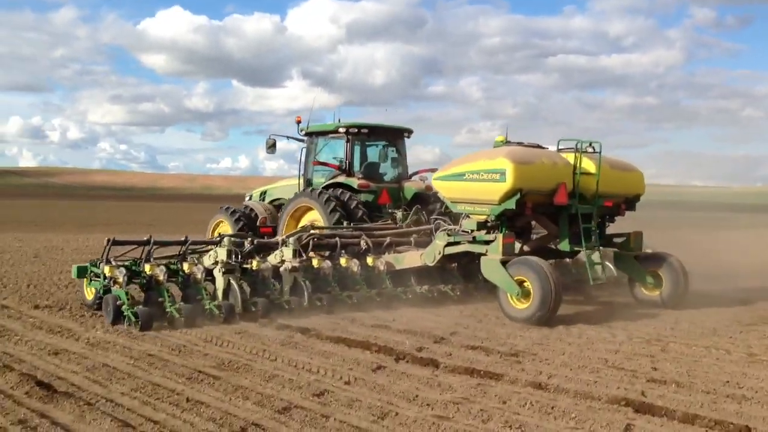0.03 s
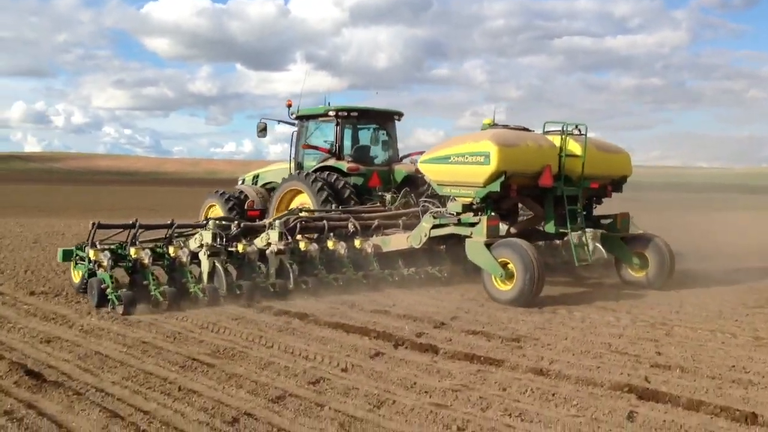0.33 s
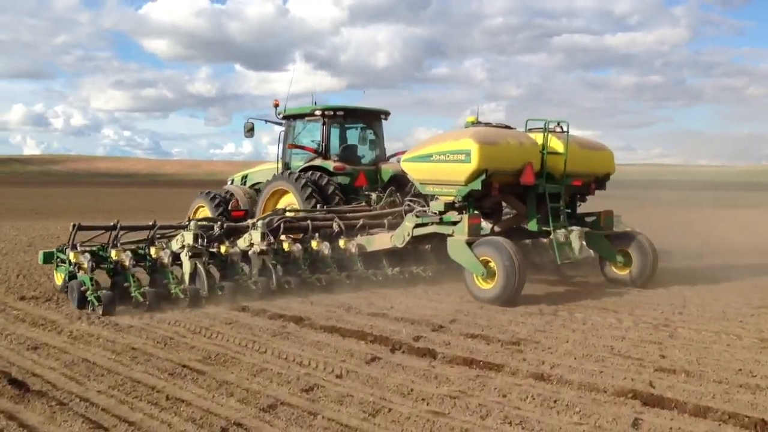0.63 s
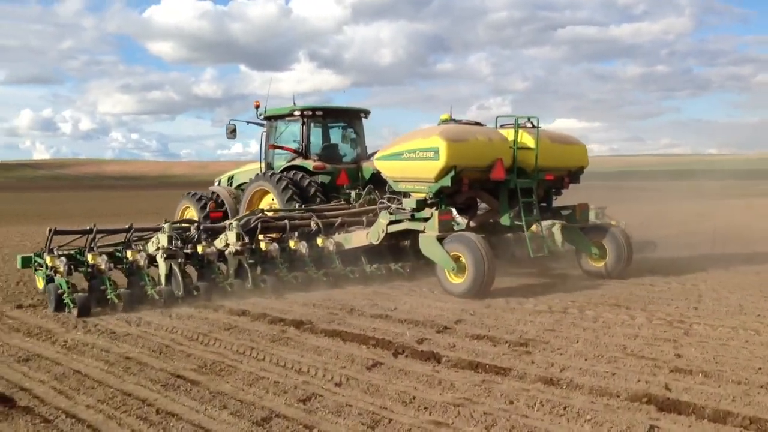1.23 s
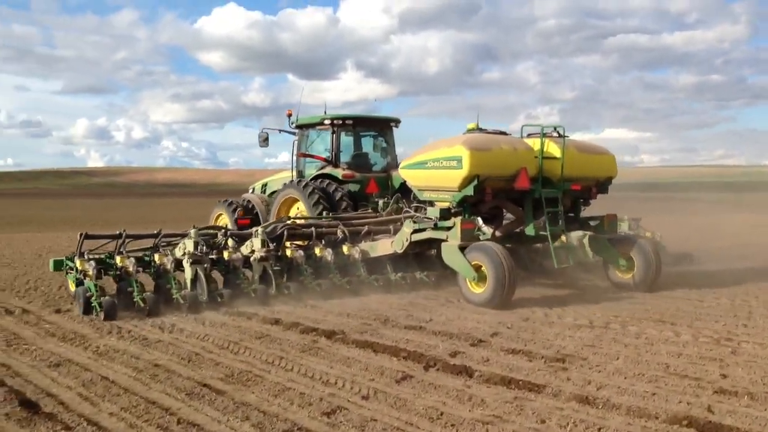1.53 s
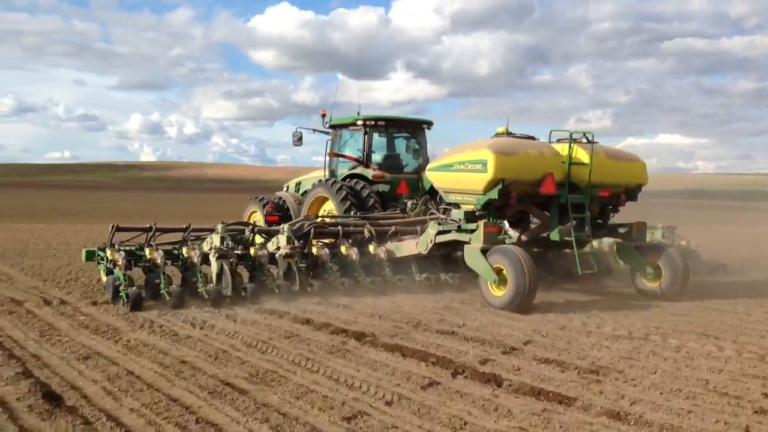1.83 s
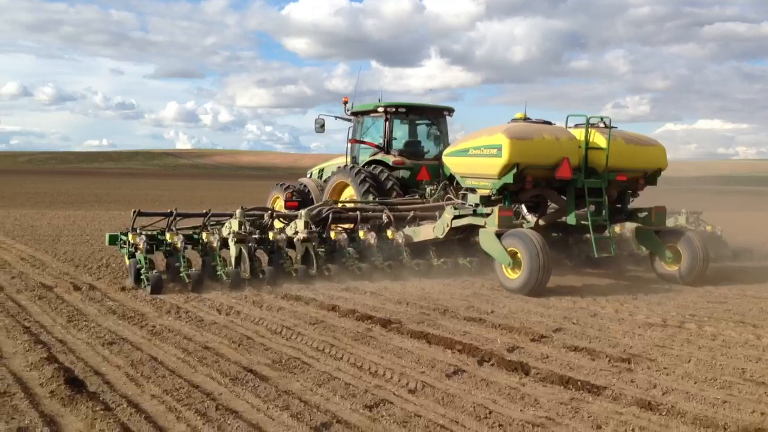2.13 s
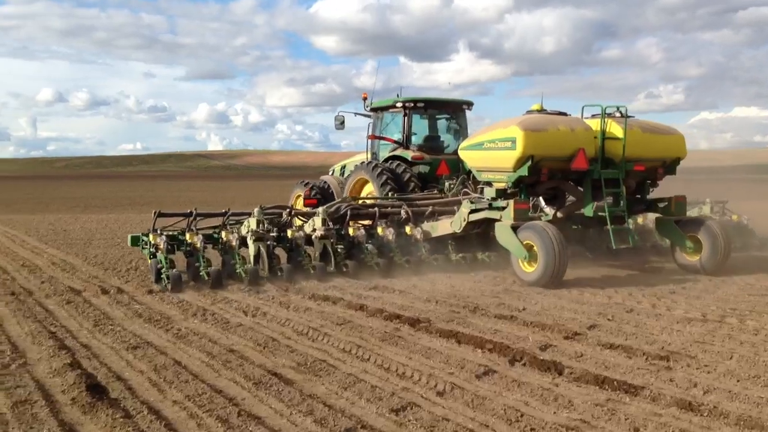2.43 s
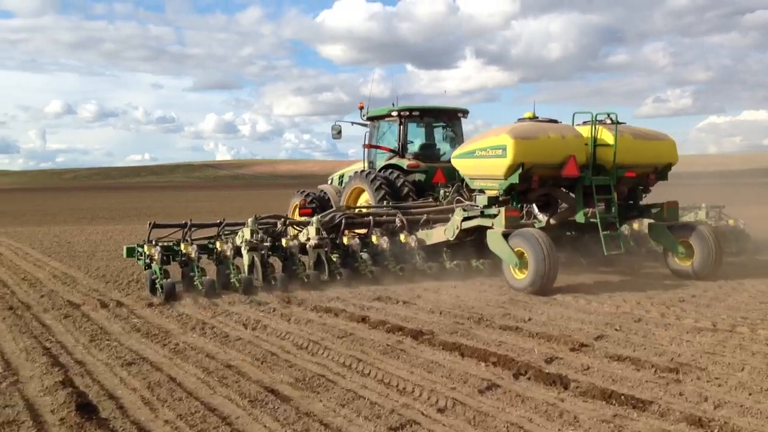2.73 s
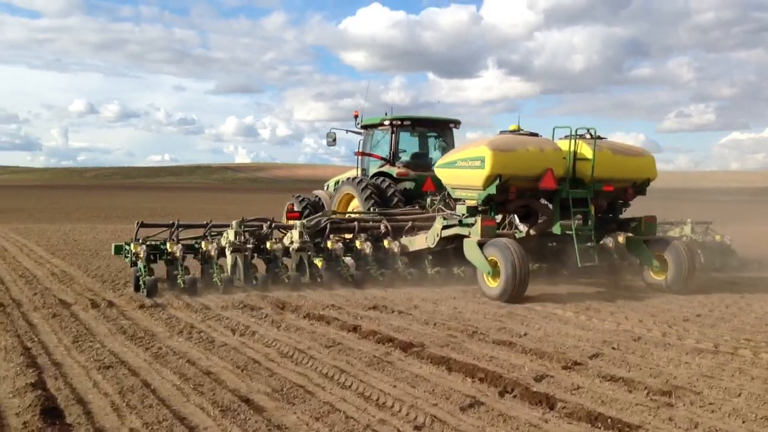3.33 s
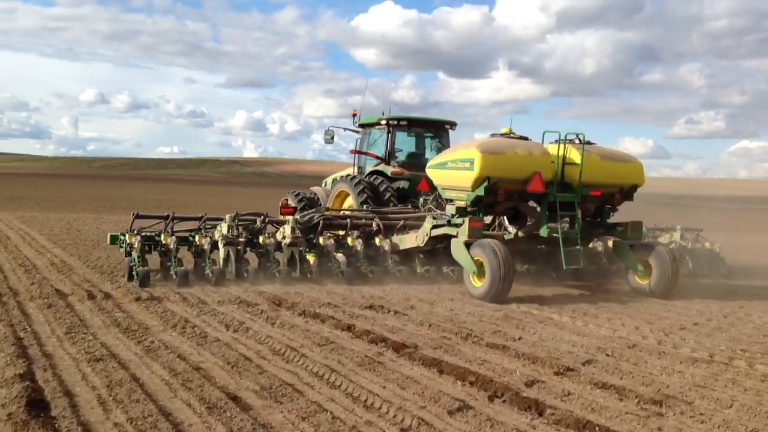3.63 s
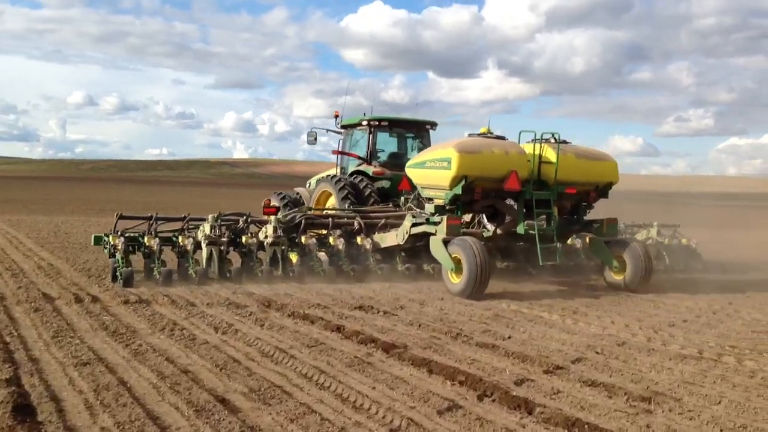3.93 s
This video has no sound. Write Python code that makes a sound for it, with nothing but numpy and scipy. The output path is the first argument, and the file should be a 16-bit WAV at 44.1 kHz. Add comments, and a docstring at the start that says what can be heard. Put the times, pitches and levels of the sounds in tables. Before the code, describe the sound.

A tractor pulls a planter across an open field some way off, its diesel roaring steadily. The planter's blower whines and hisses, with faint brief squeals, while light wind bumps the microphone, most near the end.

```python
"""A tractor pulls an air planter across a dry field, some way from the microphone.
The planter's blower sings in four partials that swell and fade; hydraulic drives, gears and the turbo
whine with the engine speed. Under them roar the diesel and the blower's air, and bearings squeal
faintly. Close up, a breeze rumbles and bumps on the microphone."""
import sys
import numpy as np
from scipy import signal
from scipy.fft import rfft, irfft, next_fast_len
from scipy.io import wavfile
from scipy.ndimage import uniform_filter1d, map_coordinates

SR = 44100
rng = np.random.default_rng(int(sys.argv[2]) if len(sys.argv) > 2 else 0)


def wrap_up_sound(samples):
    """Save the sound to the file named by the first command line argument, as 16-bit audio."""
    columns = np.atleast_2d(samples).T
    # keep every value between -1 and 1, then stretch to whole-number steps
    tamed = np.clip(columns, -1, 1)
    steps = np.round(tamed * 32767).astype(np.int16)
    wavfile.write(sys.argv[1], SR, steps)


N = 176400


def amp(db):
    """Decibels to gain."""
    return 10 ** (np.asarray(db) / 20)


def unit(x):
    """Scaled to rms 1."""
    return x / np.sqrt(np.mean(x ** 2) + 1e-20)


def along(points, hz):
    """Read (Hz, value) points at hz, on a log frequency axis."""
    freqs, values = np.transpose(points)
    return np.interp(np.log(hz + 1), np.log(freqs + 1), values)


def curves(rows):
    """One value per sample for each column after the time."""
    times, *columns = np.transpose(rows)
    return [np.interp(np.arange(N) / SR, times, column) for column in columns]


def wobble(rate):
    """A smooth random curve, rate knots a second."""
    return map_coordinates(rng.standard_normal(2048), [np.arange(N) * rate / SR], mode="wrap")


def filtered(x, response):
    """Filter x by a gain given as a function of Hz."""
    size = next_fast_len(N + SR // 2)
    return irfft(rfft(x, size) * response(np.fft.rfftfreq(size, 1 / SR)), size)[..., :N]


def rush(spectrum, patchy_db):
    """Coloured noise of rms 1, with patches of random gain in time and frequency."""
    bins = signal.stft(rng.standard_normal(N), nperseg=512)[2]
    patches = uniform_filter1d(rng.standard_normal(bins.shape), size=6, axis=0)
    patches = uniform_filter1d(patches, size=16, axis=1)
    noise = signal.istft(bins * amp(patchy_db * unit(patches)), nperseg=512)[1][:N]
    return unit(filtered(noise, lambda hz: amp(along(spectrum, hz))))


def tone(hz, speed, drift, scatter, flutter_rate):
    """A whine of rms 1 that follows the shaft speed; moving air scatters part of it."""
    phase = 2 * np.pi * np.cumsum(hz * speed * (1 + drift * wobble(6))) / SR
    in_phase = (1 + scatter * wobble(flutter_rate)) * np.sin(phase)
    quadrature = scatter * wobble(flutter_rate) * np.cos(phase)
    return unit(in_phase + quadrature)


def blower(speed, blade_hz):
    """The blower's blade-pass tone and overtones, each swelling and fading as the rig moves."""
    # Swells of partials 1 to 4. Each row: time in seconds, level in dB before the trim.
    first = [(0, -32.5), (0.4, -28), (0.65, -31.5), (1.15, -34.5), (1.45, -27.5), (1.8, -30.5),
             (2.1, -30.5), (2.55, -31.5), (2.85, -35.8), (3.1, -36), (3.35, -41), (4, -50)]
    second = [(0, -35.1), (0.17, -35), (0.28, -43.1), (0.5, -30.4), (0.62, -28.5), (0.85, -42),
              (1.05, -30.7), (1.28, -32), (1.45, -40.2), (1.62, -42), (1.98, -31.5), (2.15, -40.5),
              (2.4, -33.5), (2.65, -26), (3.1, -27.5), (3.5, -32), (4, -31.5)]
    third = [(0, -58), (1.1, -51), (1.55, -39.5), (2, -42), (2.4, -36.5), (3.1, -35), (3.5, -47.2),
             (4, -40)]
    fourth = [(0, -42), (0.35, -47.6), (0.65, -37.5), (1.3, -48.5), (1.6, -41), (2.4, -42), (2.6, -46.5),
              (3.05, -45.5), (3.35, -45), (3.8, -39), (4, -43.5)]
    # One trim in dB for each partial.
    trim_db = [0.2, -0.13, -0.09, -0.3]
    out = np.zeros(N)
    for k, swells in enumerate([first, second, third, fourth]):
        gain = amp(curves(swells)[0] + trim_db[k])
        out += gain * tone((k + 1) * blade_hz, speed, drift=.0002, scatter=.14, flutter_rate=16)
    return out


def drives(speed):
    """Pump, gears and turbo whine with the engine; the high whistles are the most blurred."""
    # Swells of the pump and gear whines. Each row: time in seconds, level in dB (the gear gets 3 more).
    pump_levels = [(0, -47), (.9, -39), (1.9, -41), (2.5, -37.5), (3.3, -37.5), (4, -33.5)]
    gear_levels = [(0, -40), (0.15, -41), (0.35, -34), (0.65, -34.5), (0.95, -36), (1.3, -40), (1.6, -46),
                   (1.8, -38.5), (2.05, -53.5), (2.3, -43), (2.6, -48), (2.85, -37), (3.1, -48.5),
                   (3.4, -39.5), (3.55, -49), (3.75, -43), (4, -45)]
    # Weaker whines and whistles of drives and turbo. Each row: pitch in Hz, level in dB.
    whine_notes = [(501, -48), (601, -53), (971, -42), (1101.5, -45.5), (1941, -45), (2204, -46),
                   (3304, -51), (3777, -51.5), (3808, -71), (4007, -50)]
    whistle_notes = [(4588, -48.5), (6112, -60), (8035, -58), (9118, -61.5), (10410, -59), (12500, -67),
                     (14290, -62)]
    pump = tone(893, speed, drift=.00059, scatter=.073, flutter_rate=13)
    gear = tone(3905, speed, drift=.0002, scatter=.19, flutter_rate=22)
    whines = sum(amp(db) * tone(hz, speed, drift=.001, scatter=.46, flutter_rate=12)
                 for hz, db in whine_notes)
    whistles = sum(amp(db) * tone(hz, speed, drift=.0013, scatter=.84, flutter_rate=40)
                   for hz, db in whistle_notes)
    pump *= amp(curves(pump_levels)[0])
    gear *= amp(curves(gear_levels)[0] + 3)
    return pump + gear + whines + whistles


def roar(speed):
    """Diesel roar and hissing air lines across the field; upper roar and hiss pulse with each firing."""
    # Spectra of the roar and of the hiss. Each row: frequency in Hz, relative density in dB.
    roar_spectrum = [(20, -48), (50, -30), (90, -19), (135, -7), (185, 2), (260, -12), (370, -13),
                     (450, -4.5), (520, 3), (630, 0), (740, 3), (860, 0), (1020, -3.5), (1250, -0.5),
                     (1450, 2), (1680, -2.5), (1980, -0.5), (2300, -4.5), (2650, -11), (2950, -14),
                     (3600, -32), (8000, -65)]
    hiss_spectrum = [(1500, -50), (2930, -25), (3010, -2.5), (3500, 1), (4450, -.5), (5200, -4.5),
                     (6200, -9), (7200, -10.5), (8300, -11), (10500, -14), (13500, -18), (15300, -23.5)]
    # Swells, each taken about its mean. Each row: time in seconds, then low roar, high roar, hiss in dB.
    swells = [(0.0, -33, -36.5, -40.5), (0.08, -34, -36, -39.5), (0.37, -35, -36, -40),
              (0.47, -33.5, -36.5, -39), (0.92, -33.5, -36, -39.5), (1.38, -34, -36.5, -40),
              (1.43, -31, -36, -39), (1.49, -35.5, -34.5, -38.5), (1.67, -34.5, -36.5, -40),
              (2.33, -36, -36, -40), (2.56, -30, -35.5, -40.5), (2.88, -35.5, -35, -40.5),
              (3.81, -35, -36, -40.5), (4.0, -33.5, -36.5, -41)]
    roar_db, hiss_db, split_hz = -29, -33.5, 960
    firing_hz, firing_depth = 99.1, .091
    low_swell, high_swell, hiss_swell = [amp(db - db.mean()) for db in curves(swells)]
    firing = firing_depth * np.cos(2 * np.pi * np.cumsum(firing_hz * speed) / SR)
    body = rush(roar_spectrum, patchy_db=1.36)
    low = filtered(body, lambda hz: 1 / (1 + (hz / split_hz) ** 6))
    engine = low * low_swell + (body - low) * high_swell * (1 + firing)
    air = rush(hiss_spectrum, patchy_db=.98) * hiss_swell * (1 + .5 * firing)
    return amp(roar_db) * engine + amp(hiss_db) * air


def breeze():
    """A faint, restless rumble of air moving over the microphone."""
    # Colour of the rumble. Each row: frequency in Hz, relative density in dB.
    spectrum = [(20, -29), (60, -22), (100, -13), (160, 1), (250, -5.5), (340, -8), (550, -17), (1500, -52)]
    # Rise and fall of the breeze. Each row: time in seconds, level in dB.
    levels = [(0, -43), (.4, -43), (.65, -44.5), (1, -39), (1.2, -53), (1.7, -45), (1.95, -47), (2.3, -45),
              (2.7, -54), (3.2, -38.5), (3.4, -46), (3.58, -40.5), (3.8, -43), (4, -47)]
    flicker_db = 2.5
    rumble = rush(spectrum, patchy_db=2) * amp(flicker_db * wobble(rate=18))
    return amp(curves(levels)[0]) * unit(rumble)


def wind_bumps():
    """Each eddy gives the microphone one low push and a puff of turbulence; small eddies sound higher."""
    # Each row: centre in seconds, level in dB before the mix, upper edge in Hz, half length in seconds.
    eddies = [(.205, -26.5, 220, 0.022), (.255, -25, 180, .02), (.365, -23.5, 200, .025),
              (.415, -19.5, 240, 0.029), (.455, -23.5, 160, 0.022), (.8, -27, 380, 0.012),
              (1.085, -23.5, 347, 0.022), (1.895, -21, 200, 0.054), (1.943, -18.5, 288, 0.011),
              (2.02, -23.5, 200, 0.063), (2.305, -25.5, 180, .02), (2.37, -26, 220, .03),
              (2.675, -21.5, 418, .014), (2.78, -26.5, 220, 0.023), (2.859, -17.5, 290, 0.011),
              (3.129, -17.5, 343, 0.017), (3.231, -21, 300, 0.018), (3.314, -15.5, 535, 0.015),
              (3.512, -13, 322, 0.028), (3.579, -13, 357, 0.013), (3.62, -16, 230, 0.016),
              (3.665, -19, 313, 0.016), (3.708, -24, 240, 0.025)]
    push_db, puff_db = -2, -11
    t, out = np.arange(N) / SR, np.zeros(N)
    for centre, db, edge_hz, half_length in eddies:
        low_hz = max(132, .44 * edge_hz)
        band = np.vstack([signal.butter(3, low_hz, "high", fs=SR, output="sos"),
                          signal.butter(2, edge_hz, fs=SR, output="sos")])
        near = np.flatnonzero(abs(t - centre) < .15)
        offset = t[near] - centre
        envelope = np.exp(-(offset / half_length) ** 2)
        impulse = signal.unit_impulse(len(near), np.argmin(abs(offset)))
        push = signal.sosfiltfilt(band, impulse)
        push /= abs(push).max()
        turbulence = rng.standard_normal(N)[near] * envelope
        puff = unit(signal.sosfiltfilt(band, turbulence)) * envelope.std()
        out[near] += amp(db) * (amp(puff_db) * puff - amp(push_db) * push)
    return out


def squeals(speed):
    """Dry bearings and discs out on the planter sing briefly, each on one note."""
    # Each row: centre in seconds, pitch in Hz, level in dB, half length in seconds.
    notes = [(1.36, 5020, -37.5, .035), (2.038, 4590, -42, 0.4), (2.38, 9125, -50, .08),
             (3.53, 14277, -58, .11), (3.85, 7130, -52, 0.21)]
    t, out = np.arange(N) / SR, np.zeros(N)
    for centre, hz, db, half_length in notes:
        envelope = np.exp(-((t - centre) / half_length) ** 4)
        out += amp(db) * envelope * tone(hz, speed, drift=.0005, scatter=.095, flutter_rate=25)
    return out


def scene():
    """One engine speed drives the distant rig, with wind close by; both channels are the same."""
    # The blower's slight wander. Each row: time in seconds, blade-pass pitch in Hz.
    blower_pitch = [(0, 755.6), (.2, 756.6), (.55, 753.4), (.95, 756), (1.25, 755), (1.55, 756.8),
                    (1.9, 754.8), (2.2, 757.7), (2.6, 754.8), (2.95, 757.3), (3.5, 754.7), (3.95, 751.3)]
    blade_hz, = curves(blower_pitch)
    speed = blade_hz / blade_hz.mean()
    rig = blower(speed, blade_hz.mean()) + drives(speed) + roar(speed) + squeals(speed)
    mono = rig + breeze() + wind_bumps()
    return np.array([mono, mono])


def record(dry):
    """The microphone rolls off the deep bass and passes nothing above its band limit."""
    low_cut_hz, top_hz = 31, 15400
    return filtered(dry, lambda hz: (hz < top_hz) * hz ** 2 / (hz ** 2 + low_cut_hz ** 2))


dry = scene()
out = record(dry)
wrap_up_sound(out)
```